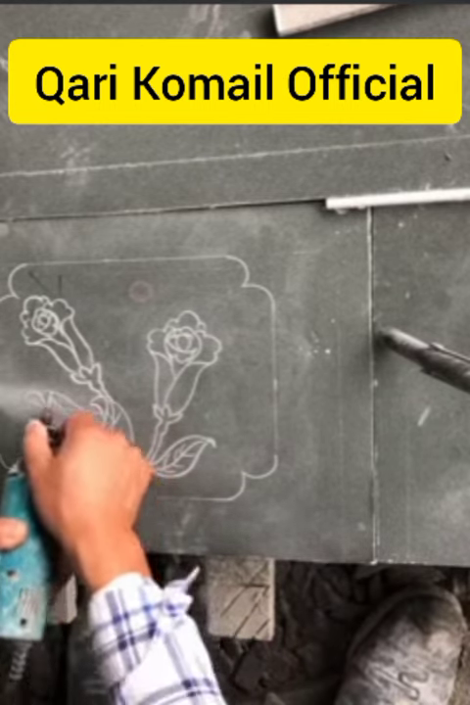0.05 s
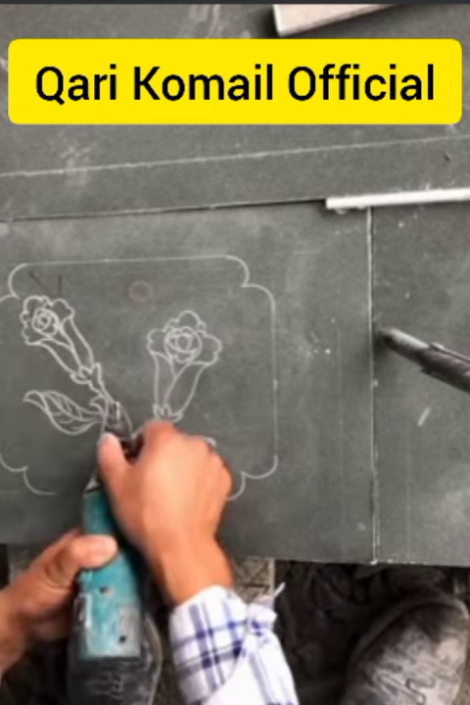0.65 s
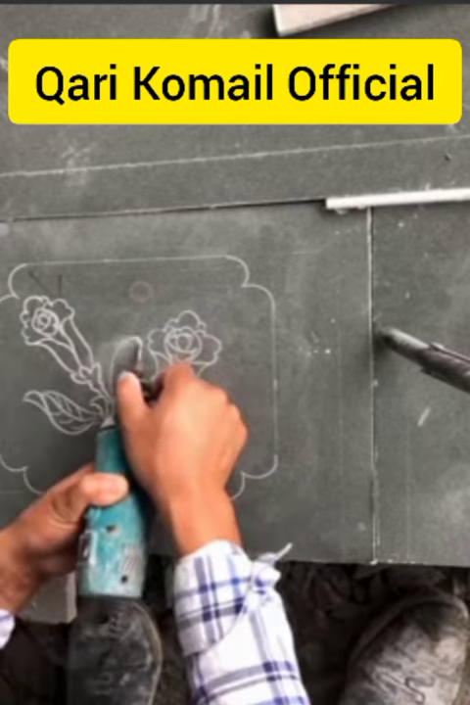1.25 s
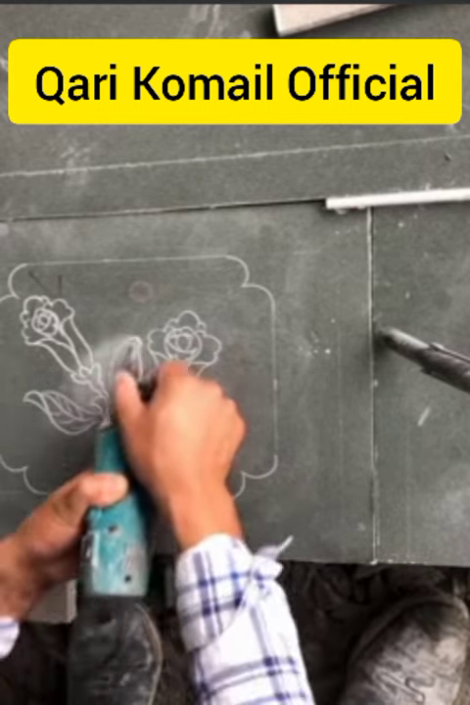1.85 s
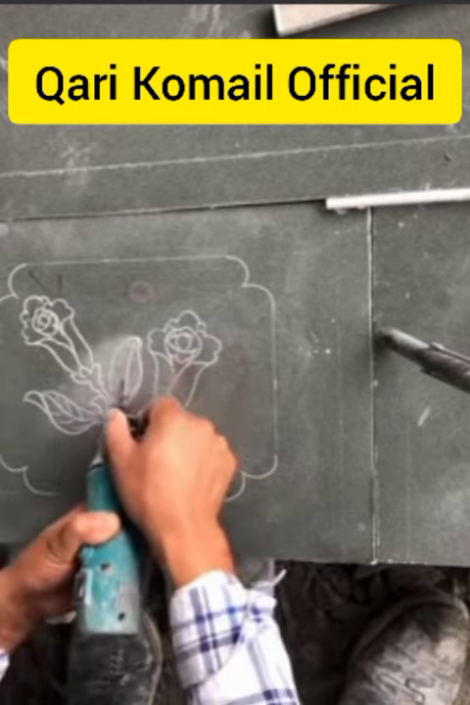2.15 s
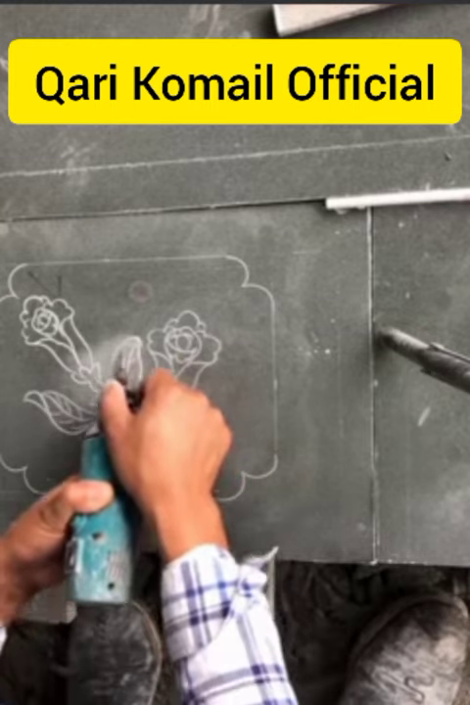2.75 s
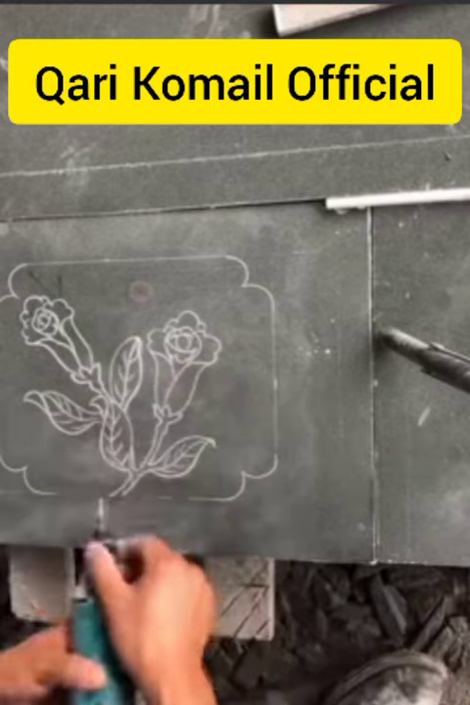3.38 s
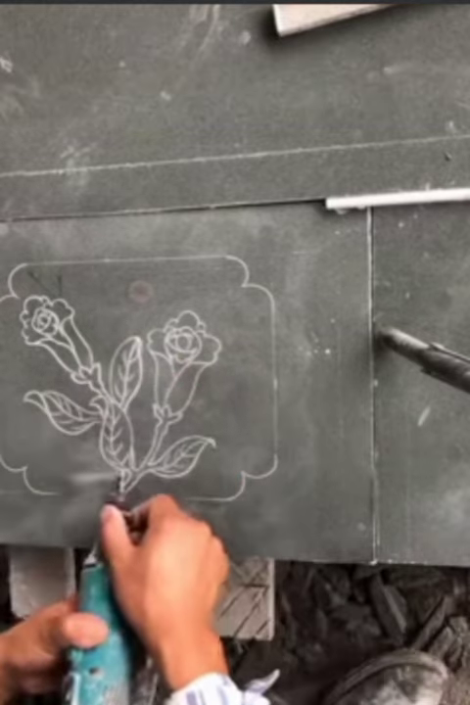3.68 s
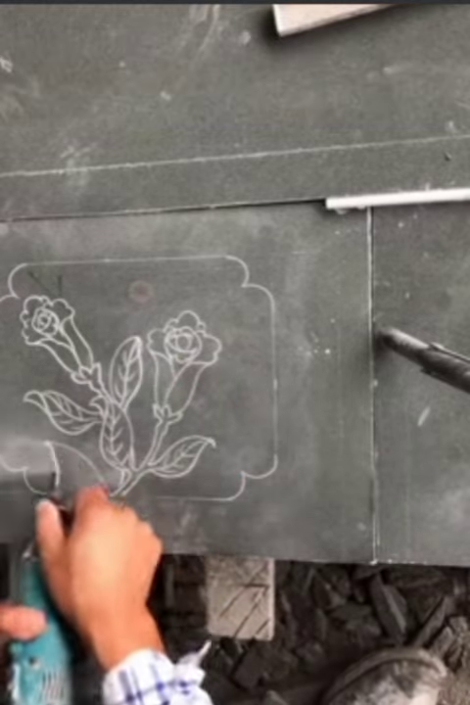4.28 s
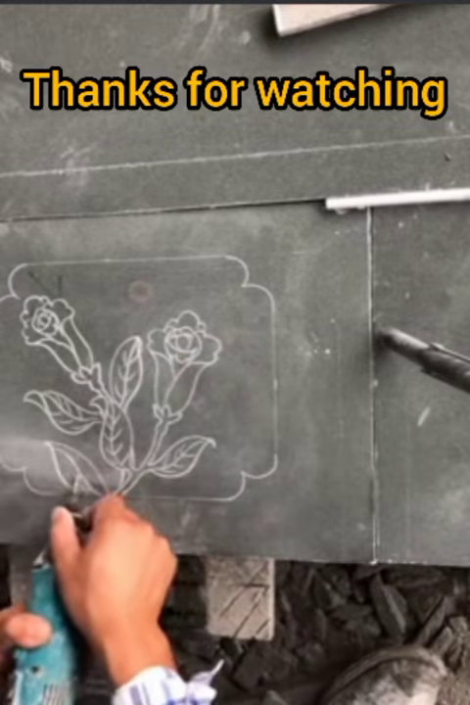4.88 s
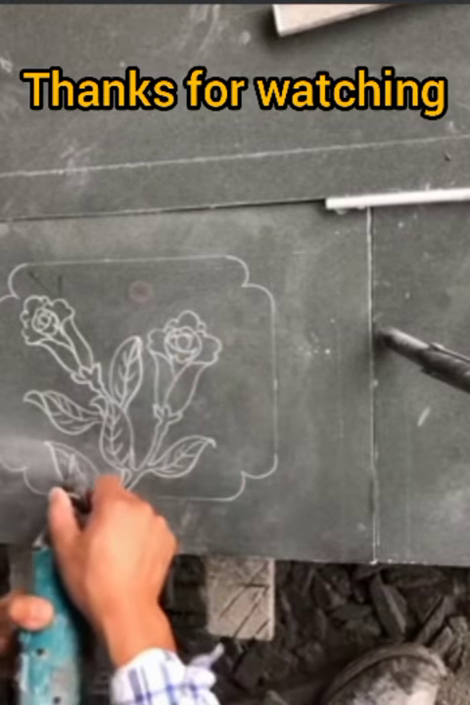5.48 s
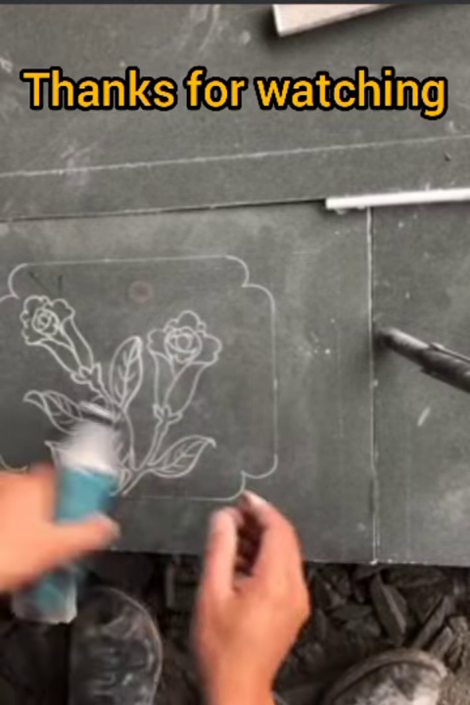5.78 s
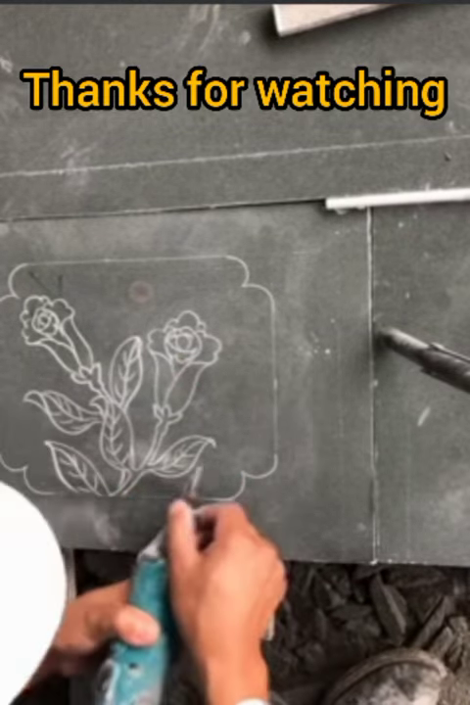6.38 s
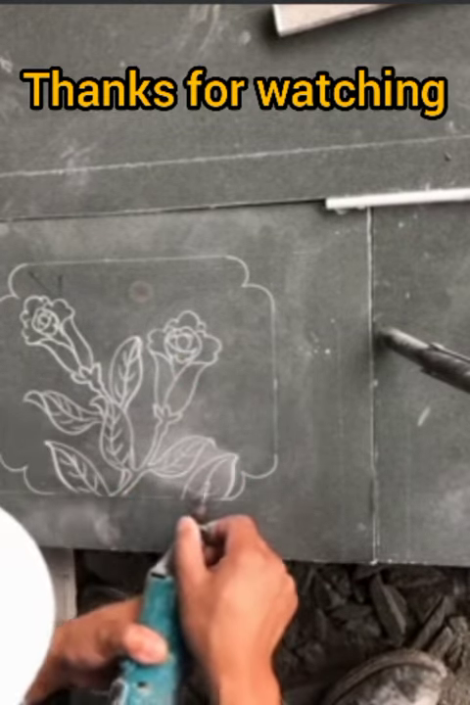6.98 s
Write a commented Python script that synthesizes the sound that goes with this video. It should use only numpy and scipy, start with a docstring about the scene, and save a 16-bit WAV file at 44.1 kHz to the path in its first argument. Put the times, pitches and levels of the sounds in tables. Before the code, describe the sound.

A small electric grinder runs throughout with a high motor whine and a rush of fan air. Its bit touches a stone slab in about two dozen short, uneven strokes, each a shrill squeal or gritty screech with a little growl. The pitch sags on the longer cuts and recovers between them. The microphone is close above the work, with a very faint workplace rumble behind.

```python
"""A hand-held electric die grinder engraves a stone slab, the microphone close above the work.
Its motor whines at about 570 turns a second and sags under load; the fan rushes through the housing.
In each stroke the bit strikes the stone once a turn, so the shank squeals near 4 kHz or screeches
near 7 kHz, and growls as it digs in. Underneath, the slab thuds faintly and the workplace rumbles."""
import sys
import numpy as np
from scipy import signal
from scipy.fft import rfft, irfft, next_fast_len
from scipy.io import wavfile
from scipy.ndimage import uniform_filter1d, minimum_filter1d

SR = 44100
rng = np.random.default_rng(int(sys.argv[2]) if len(sys.argv) > 2 else 0)


def master(y):
    """Save y as 16-bit WAV."""
    cut = np.clip(np.atleast_2d(y).T, -1, 1)
    pcm = np.round(cut * 32767)  # scale
    wavfile.write(sys.argv[1], SR, pcm.astype(np.int16))


N = 310464

# Strokes of the bit on the stone; load is the spindle speed it would cost if held. Levels are relative.
# (start [s], end [s], final load [Hz], squeal [dB], low screech [dB], high screech [dB],
#  growl [dB], chatter [dB], slab thud [dB])
STROKES = [(-.03, 0.019, 12.2, -23.5, -50, -45, -36, -39, -58),
           (0.093, 0.154, 17.6, -26, -27, -37, -37, -43, -68),
           (.223, 0.289, 15.3, -24.5, -31, -48, -35, -32, -87),
           (0.916, 1.275, 42, -25.5, -25.5, -34, -37, -66, -72.5),
           (1.454, 1.536, 13, -32, -41, -35.5, -37, -47, -75),
           (1.55, 1.784, 77.7, -21.5, -36, -35, -39.5, -43, -72),
           (1.927, 2.075, 57, -24, -31, -31.5, -34.5, -36, -69),
           (2.279, 2.33, 3.3, -48, -38, -32, -36, -46, -67),
           (2.393, 2.447, 9.46, -33, -20.5, -25.5, -34, -50, -68),
           (2.497, 2.553, 15.46, -27, -24, -28, -34, -47, -58),
           (2.721, 2.777, 38, -21, -28, -30, -34, -36, -67),
           (2.843, 2.908, 22.9, -24, -35, -30.5, -35, -43, -69),
           (2.973, 3.034, 45.7, -21, -26, -28, -41, -55, -67),
           (3.862, 3.953, 32.2, -20, -27, -50, -57, -55, -77),
           (4.263, 4.571, 71.7, -20, -24.5, -44, -41, -40.5, -80),
           (4.687, 4.81, 75.6, -14.5, -31, -42, -32.5, -33.5, -85),
           (4.979, 5.049, 32, -23.5, -34, -49, -35, -59, -77),
           (5.106, 5.163, 32.3, -17, -52, -40, -34, -53, -80),
           (5.202, 5.258, 67, -16, -47, -44, -50, -44, -83),
           (5.395, 5.461, 33, -18.5, -29, -39, -37.5, -52, -73),
           (5.537, 5.585, 26, -17, -19.5, -44, -40, -41, -75),
           (5.653, 5.693, 32.4, -15.5, -26.5, -44, -34, -35, -79),
           (6.566, 6.78, 86, -20.5, -28, -49, -47, -37, -91),
           (6.885, 6.995, 56, -22, -50, -40, -54, -29.5, -88)]
# the ways the shank rings: (multiple of the speed, relative level [dB])
SQUEAL_PARTIALS = [(5, -42), (6, -17), (7, 1), (14, -29), (18, -47)]
CHIRP_PARTIALS = [(9, -18), (10, -44), (11, -21.5), (16, -28.5), (17, -39)]
LOW_SCREECH_PARTIALS = [(10, -22), (11, -17), (12, 2.5), (13, -8), (14, -33), (18, -26), (23, -34),
                        (25, -35)]
HIGH_SCREECH_PARTIALS = [(12, 8), (13, 5), (14, -15.5), (18, -18), (25, -34), (26, -30), (27, -40)]
GROWL_PARTIALS = [(3, -4), (6, -23)]
CHATTER_PARTIALS = [(4, -6), (5, -22.5), (6, -13), (9, -14)]
# motor partials that swell and fade as the tool turns in the hand: (time [s], relative level [dB])
SECOND_LEVEL = [(0.0, -33.5), (0.3, -35.5), (0.42, -45), (0.81, -32), (1.44, -35), (1.53, -31.5),
                (2.01, -36.5), (3.05, -31.5), (3.17, -61), (3.59, -37), (4.31, -34), (5.0, -42.5),
                (5.81, -34.5), (6.11, -54), (6.67, -26.5), (6.82, -44), (6.91, -34), (7.03, -52)]
THIRD_LEVEL = [(0.0, -33.5), (0.48, -41.5), (0.54, -33.5), (1.47, -48), (1.53, -27.5), (1.71, -54),
               (2.07, -40), (2.13, -47), (2.75, -37), (2.78, -41.5), (3.53, -30.5), (3.68, -42.5),
               (5.69, -45), (6.08, -29), (6.35, -42), (6.5, -30.5), (6.76, -43), (7.03, -50)]
EIGHTH_LEVEL = [(0, -33), (.27, -33), (.35, -29), (.49, -19.5), (.56, -35), (.88, -30.5), (1.3, -29.5),
                (1.5, -25.5), (2.05, -37), (3.03, -32.5), (3.17, -25.5), (3.52, -34.5), (3.78, -25),
                (4.05, -33.5), (5.1, -42), (6.12, -25.5), (6.27, -33), (7.04, -35)]
# the motor's weaker partials: (multiple of the speed, relative level [dB])
MOTOR_OVERTONES = [(5, -43.5), (6, -38), (7, -44), (9, -55), (10, -38), (11, -43.5), (12, -67), (13, -81),
                   (16, -75), (18, -64), (19, -61.5), (20, -67)]
# five bands of fan air and abrasive hiss: (frequency [Hz], relative density [dB])
VENT_BAND = [(250, -102), (320, -89.5), (480, -80.5), (620, -76.5), (730, -70), (820, -71), (910, -60),
             (1100, -61), (1220, -63.5), (1370, -71.5), (1520, -66), (1800, -74), (2600, -70.5)]
HOUSING_BAND = [(1200, -69.5), (1700, -72), (2050, -66), (2350, -73), (2700, -71), (2900, -68.5),
                (3400, -65), (4000, -59.5), (4700, -62), (5000, -63), (5300, -81), (6000, -116)]
HISS_BAND = [(4900, -73), (5300, -66), (5600, -60.5), (5850, -61.5), (6150, -57.5), (6700, -56),
             (7250, -59.5), (7500, -65), (7850, -75.5), (8400, -99.5), (9500, -100)]
FIZZ_BAND = [(7000, -63), (8300, -81), (9500, -79.5), (10400, -83), (11000, -78.5), (12000, -79),
             (13050, -86), (13500, -98), (14000, -105), (15500, -112)]
SIZZLE_BAND = [(7400, -76), (8000, -71), (8700, -74.5), (9300, -79), (10000, -101)]
# a row for each band above, whose level dips during a stroke: (free-running gain [dB], dip on contact [dB], dip
# per load [dB/Hz], dip under a loud squeal [dB])
AIR_MIX = [(2, 2.5, 0.0566, 3.0), (1.75, 2.04, 0.05, 3), (0.5, -.8, 0.0552, 1.5), (2, 2.0, 0.0247, 1.5),
           (-.3, 1.5, .005, 2)]
# the air shifts as the tool moves below the microphone: (time [s], rush [dB], hiss [dB], fizz [dB])
NEARNESS = [(0, 0.9, -0.5, -1), (.7, 0.1, 1.8, 0), (1.25, 1.3, 0, 0.7), (2.15, -0.4, 1.2, 1.2),
            (2.8, 1.1, 0, -1.5), (3.25, 0.7, 0.1, 0.7), (4.2, 0.2, -1, 0.5), (4.8, 0.1, -1.8, 0),
            (5.6, 0.8, -1.7, 0.5), (6.05, 0.9, 0, 1.5), (6.45, .9, -1, 0.5), (6.75, -0.1, 0.8, 0.5),
            (7.04, -.8, -1.1, -2)]
# the sizzle opens up in the later strokes: (time [s], gain [dB])
SIZZLE_GAIN = [(0, -4), (3.8, -13), (4.05, 0), (5.5, 0), (7.04, 1)]
# the slab's dull answer: (frequency [Hz], relative density [dB])
THUD_BAND = [(30, -18), (70, 2), (110, 1.5), (220, 1), (320, 8), (500, -9)]
# the workplace behind the tool: (frequency [Hz], density [dB])
RUMBLE_BAND = [(20, -106), (50, -108), (100, -106), (200, -102), (300, -103), (600, -110)]

FREE_HZ, START_SAG_HZ, SPIN_LAG_S = 583.8, 7.4, .29
# change of level with load [dB/Hz]; the falter is a random swing of the squeal
SQUEAL_PER_LOAD, SCREECH_PER_LOAD, CHATTER_PER_LOAD, FALTER_PER_LOAD = -.1, -.049, .16, .09
HUM_PER_LOAD, EIGHTH_PER_LOAD = .085, -.01


def cutting(angle, load, squeal, low, high, growl, chatter):
    """The bit squeals, chirps and screeches on the stone; under heavy load it growls and chatters."""
    whistle = fitful(2.2, rate=20) * shank(angle, SQUEAL_PARTIALS, skid=.02, grit_db=1.2, flutter=.09)
    chirps = sum(from_db(db) * fitful(11, rate=14) * partial(angle, k, flutter=.3, flutter_rate=40)
                 for k, db in CHIRP_PARTIALS)
    # the screech catches and slips on the uneven stone
    catching = fitful(3.97, rate=29) * from_db(-1 + SCREECH_PER_LOAD * load)
    falter_db = FALTER_PER_LOAD * load * np.tanh(drift(16))
    out = from_db(.8 + SQUEAL_PER_LOAD * load + falter_db) * squeal * (whistle + chirps)
    out += low * catching * shank(angle, LOW_SCREECH_PARTIALS, skid=.045, grit_db=5, flutter=.4)
    out += high * catching * shank(angle, HIGH_SCREECH_PARTIALS, skid=.04, grit_db=5, flutter=.4)
    digging = from_db(CHATTER_PER_LOAD * load)
    out += growl * digging * shank(angle, GROWL_PARTIALS, skid=.02, grit_db=2, flutter=.46)
    return out + chatter * digging * shank(angle, CHATTER_PARTIALS, skid=.019, grit_db=2, flutter=.78)


def shank(angle, partials, skid, grit_db, flutter):
    """The shank rings at multiples of the speed; stone grains shift each strike's moment and force."""
    struck = angle + skid * drift(70)
    tones = sum(from_db(db) * partial(struck, k, flutter, flutter_rate=22) for k, db in partials)
    return tones * fitful(grit_db, rate=73)


def contact(bite_s, lift_s, arch, first_touch=.15, dab_s=.074):
    """The bit bites, the hand leans in steadily, then lifts: touch, load and each vibration's gain."""
    t = np.arange(N) / SR
    touch, load, ringing = np.zeros(N), np.zeros(N), np.zeros((6, N))
    for start, end, final_load, *levels_db in STROKES:
        near = (t > start - bite_s) & (t < end + lift_s)
        inside = np.clip(np.minimum((t[near] - start) / bite_s, (end - t[near]) / lift_s), -1, 1)
        grip = (1 + np.sin(np.pi / 2 * inside)) / 2
        progress = np.clip((t[near] - start) / (end - start), 0, 1)
        touch[near] += grip
        load[near] += grip * final_load * (first_touch + (1 - first_touch) * progress)
        # short dabs swell and taper; longer strokes are held flatter
        swell = 1 - arch * min(1, dab_s / (end - start)) * np.cos(2 * np.pi * progress)
        ringing[:, near] += from_db(levels_db)[:, None] * grip * swell
    return touch, load, ringing


def rotation(load, wobble_hz, wobble_rate):
    """Spindle angle: it slows under load and recovers; brush friction makes the speed tremble."""
    run_up = START_SAG_HZ * np.exp(-np.arange(N) / SR / SPIN_LAG_S)
    sag = settle(load, SPIN_LAG_S) + run_up
    speed_hz = FREE_HZ - sag + wobble_hz * drift(wobble_rate)
    return 2 * np.pi * np.cumsum(speed_hz) / SR


def motor(angle, touch, load):
    """Unbalance, fan blades and commutator sound at multiples of the speed; weak ones come and go."""
    second, third, eighth = in_time(SECOND_LEVEL) + in_time(THIRD_LEVEL) + in_time(EIGHTH_LEVEL)
    hum = -41 - 8 * touch + HUM_PER_LOAD * load   # drops on contact, returns as the bit digs in
    levels_db = {1: hum, 2: second, 3: third, 4: -41, 8: eighth + EIGHTH_PER_LOAD * load}
    strong = sum(from_db(db) * fitful(2.5, rate=7) * partial(angle, k, flutter=.22, flutter_rate=20)
                 for k, db in levels_db.items())
    weak = sum(from_db(db) * fitful(4, rate=2) * partial(angle, k, flutter=.5, flutter_rate=18)
               for k, db in MOTOR_OVERTONES)
    return from_db(-.17) * strong + from_db(-.3 - 3.5 * touch) * weak


def air(angle, touch, load, squeal, throb=.065, loud_squeal_db=-18):
    """Fan air and abrasive hiss in broad resonances pulse with each turn; their level dips during and just
    after the strokes."""
    bands = (VENT_BAND, HOUSING_BAND, HISS_BAND, FIZZ_BAND, SIZZLE_BAND)
    rush_db, hiss_db, fizz_db = in_time(NEARNESS)
    slow_db = (rush_db, rush_db, hiss_db, fizz_db, *in_time(SIZZLE_GAIN))
    squealing = squeal * from_db(SQUEAL_PER_LOAD * load - loud_squeal_db)
    rush = 0
    for band, near_db, (free_db, touch_db, per_load, squeal_db) in zip(bands, slow_db, AIR_MIX):
        dip_db = air_dip(touch_db * touch + per_load * load + squeal_db * squealing)
        rush += noise(band) * from_db(free_db + near_db - dip_db) * fitful(1.55, rate=18.3)
    return rush * (1 + throb * np.cos(angle))


def air_dip(dip_db, lag_s=.011, recovery_db_per_s=98):
    """The level of the air noise dips quickly and recovers at a slower, steady rate."""
    ramp = recovery_db_per_s * np.arange(N) / SR
    return settle(np.maximum.accumulate(dip_db + ramp) - ramp, lag_s)


def bass_cut(x, low_cut_hz):
    """The tool's sound falls away steeply below about 300 Hz."""
    return signal.sosfilt(signal.butter(6, low_cut_hz, "high", fs=SR, output="sos"), x)


def slab(thud):
    """A faint, dull thud from the slab under each stroke, at that stroke's own level."""
    return from_db(3.5) * thud * rms_one(noise(THUD_BAND))


def workplace():
    """Room tone: a quiet, steady rumble behind the tool."""
    return noise(RUMBLE_BAND)


def partial(angle, multiple, flutter, flutter_rate):
    """One multiple of the rotation, unsteady in strength and phase; rms about 1."""
    phase = multiple * angle + rng.uniform(0, 2 * np.pi)
    wave = (1 + flutter * drift(flutter_rate)) * np.cos(phase)
    wave += flutter * drift(flutter_rate) * np.sin(phase)
    return wave / np.sqrt(.5 + flutter ** 2)


def noise(band):
    """Noise with the band's density, falling 60 dB an octave beyond its ends."""
    size = next_fast_len(N)
    hz, level_db = np.transpose(band)
    octave, knots = np.log2(np.fft.rfftfreq(size, 1 / SR) + 1), np.log2(hz)
    outside = np.abs(octave - np.clip(octave, knots[0], knots[-1]))
    gain = from_db(np.interp(octave, knots, level_db) - 60 * outside)
    return irfft(rfft(rng.standard_normal(size)) * gain, size)[:N] * np.sqrt(SR / 2)


def fitful(swing_db, rate):
    """A gain of unit power that comes and goes."""
    return rms_one(from_db(swing_db * np.tanh(drift(rate))))


def drift(rate):
    """A smooth random curve of spread 1 that changes about rate times a second."""
    pole = np.exp(-40 * np.pi * rate / SR)
    steps = rng.standard_normal(N // 20 + 2002)   # one every 20 samples
    slow = signal.lfilter([1], [1, -2 * pole, pole * pole], steps)[2000:]
    return np.interp(np.arange(N) / 20, np.arange(len(slow)), rms_one(slow))


def settle(x, lag_s):
    """Follow x with inertia."""
    pole = np.exp(-1 / (lag_s * SR))
    return signal.lfilter([1 - pole], [1, -pole], x + 1e-18)


def in_time(rows):
    """A list of a table's level curves, sample by sample."""
    times, *columns = np.transpose(rows)
    return [np.interp(np.arange(N) / SR, times, column) for column in columns]


def from_db(db):
    """Decibels to gain."""
    return 10 ** (np.asarray(db) / 20)


def rms_one(x):
    """Scale to unit power."""
    return x / np.sqrt(np.mean(x ** 2) + 1e-20)


def limiter(x, ceiling, release_db_per_s):
    """The gain drops just ahead of a peak and recovers steadily, so the hiss ducks under loud squeals."""
    ramp = release_db_per_s * np.arange(N) / SR
    over_db = 20 * np.log10(np.maximum(np.abs(x[0]) / ceiling, 1))
    held_db = np.maximum.accumulate(over_db + ramp) - ramp
    return x * from_db(uniform_filter1d(minimum_filter1d(-held_db, size=89), size=89))


def scene():
    """Close up, one spindle drives whine, air and cutting alike; slab and room lie underneath."""
    touch, load, (squeal, *harsher, thud) = contact(bite_s=.016, lift_s=.013, arch=.35)
    angle = rotation(load, wobble_hz=.6, wobble_rate=22)
    tool = motor(angle, touch, load) + air(angle, touch, load, squeal)
    tool += cutting(angle, load, squeal, *harsher)
    return (bass_cut(tool, low_cut_hz=306) + slab(thud) + workplace())[None]


def record(dry, cutoff_hz=15700):
    """One microphone close above the slab; peaks are limited and the top is cut steeply."""
    limited = limiter(dry, ceiling=.44, release_db_per_s=60)
    return signal.sosfilt(signal.ellip(12, .1, 80, cutoff_hz, fs=SR, output="sos"), limited)


dry = scene()
out = record(dry)
master(out)
```